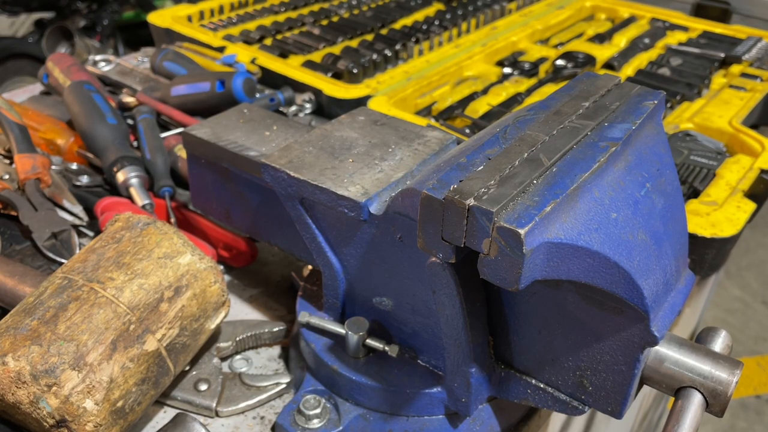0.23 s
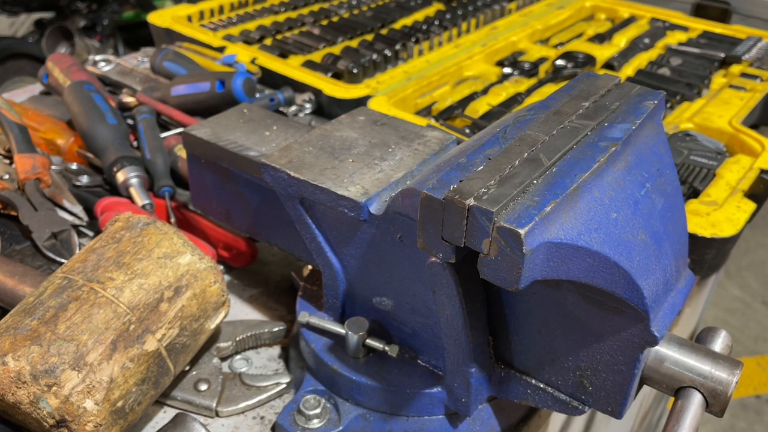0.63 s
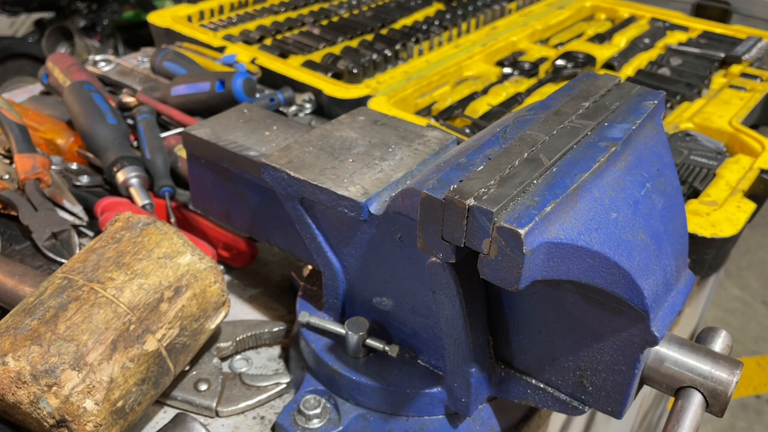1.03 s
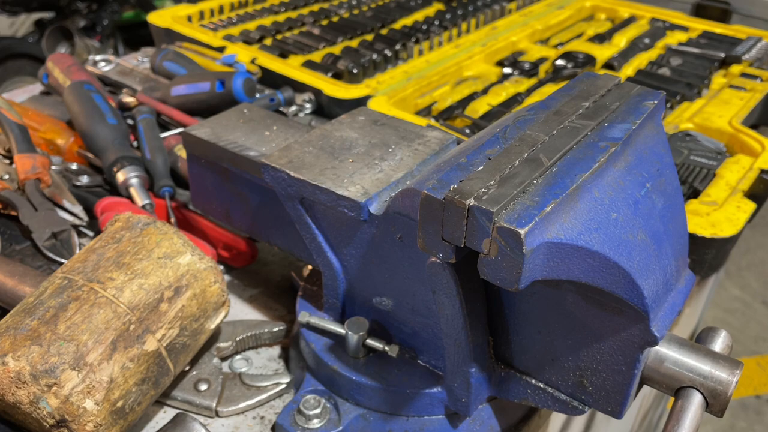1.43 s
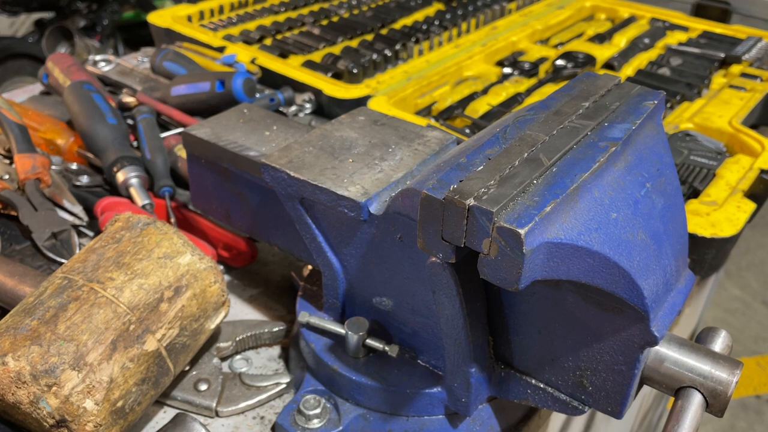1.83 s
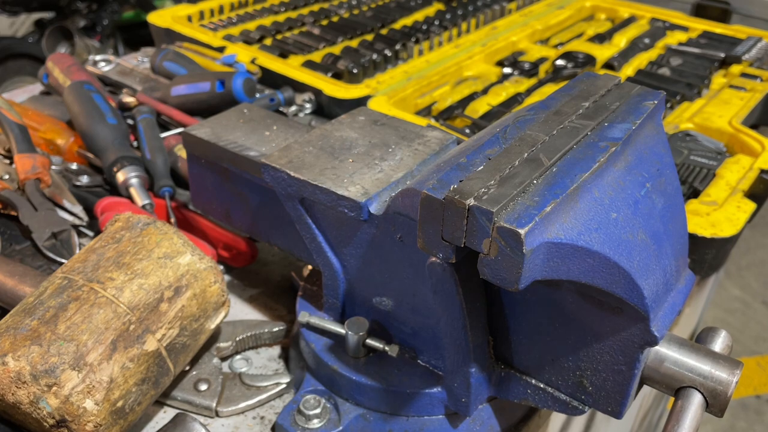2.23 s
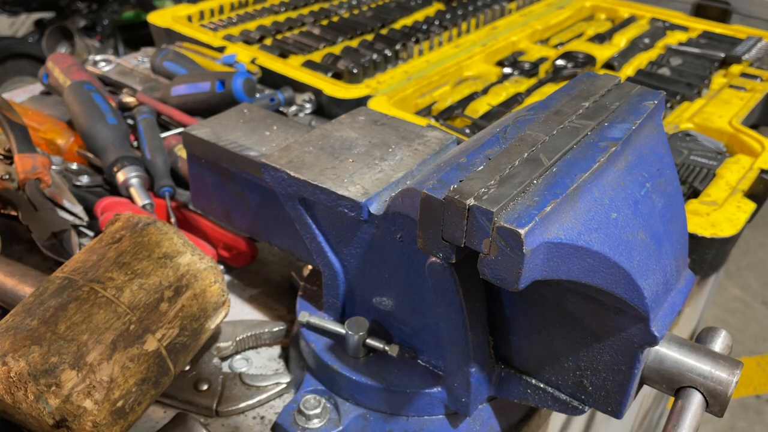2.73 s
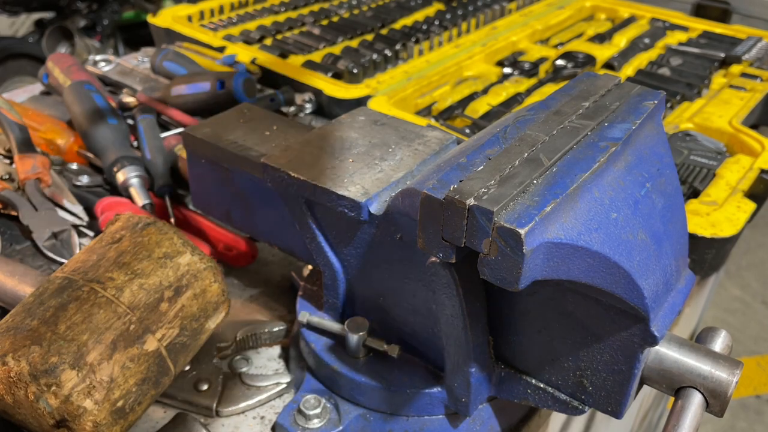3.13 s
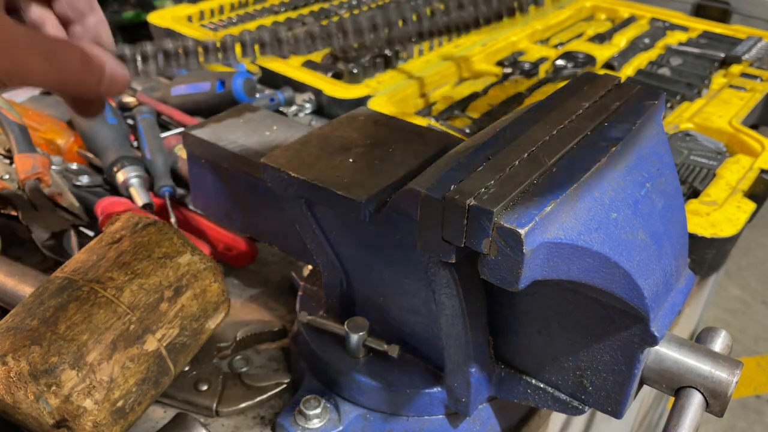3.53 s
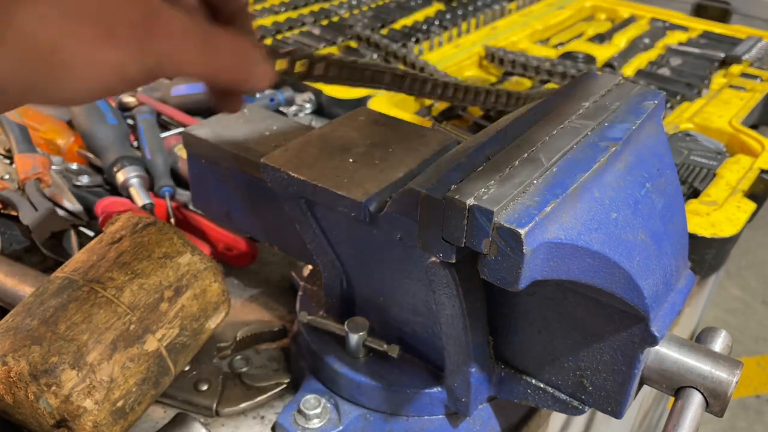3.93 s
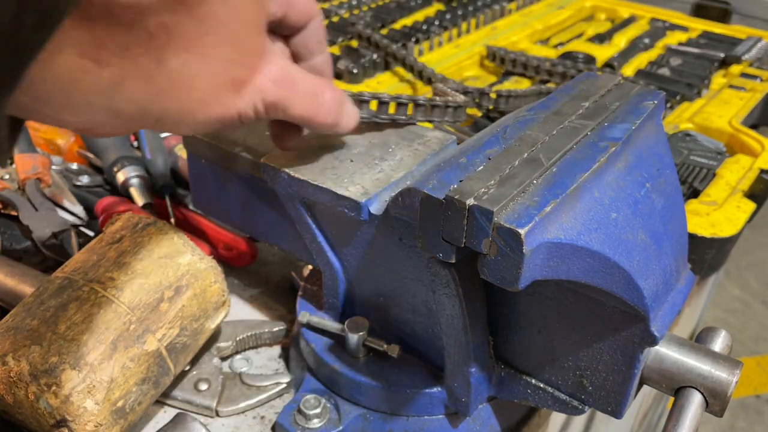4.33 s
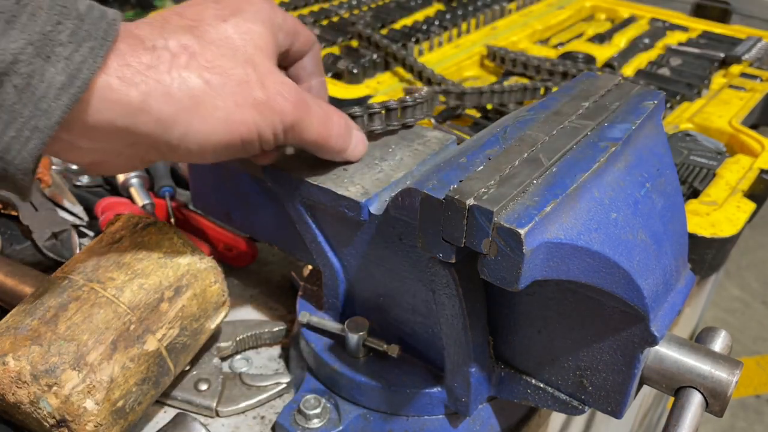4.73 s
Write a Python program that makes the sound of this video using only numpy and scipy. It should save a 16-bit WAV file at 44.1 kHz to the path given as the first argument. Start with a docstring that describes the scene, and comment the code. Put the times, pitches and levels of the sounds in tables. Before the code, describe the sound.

In a workshop with steady low machine hum, soft dull bumps and faint scrapes come first, with a gentle swelling rush. Then a roller chain hits a plastic tool tray twice, the second hit louder and brighter, and small ticks and a little gritty rubbing follow as it settles. Close stereo microphone, short room reverberation.

```python
"""A roller chain is lifted, carried and dropped on a plastic tool tray on a workshop bench, near a two-port microphone.
Handling and link contacts crack, ring and knock; the chain lands twice on the tray and settles in small touches.
A loose roller jingles, links slide as gritty noise, and bumps ring the bench's low modes, first before the landings.
A soft, broad rush swells and fades with a finer hiss on top, mains machinery hums, and the workshop answers."""
import sys
import numpy as np
from scipy import signal
from scipy.fft import rfft, irfft, next_fast_len
from scipy.io import wavfile
from scipy.ndimage import map_coordinates

SR = 44100
rng = np.random.default_rng(int(sys.argv[2]) if len(sys.argv) > 2 else 0)


def boost_factor(decibels):
    """Convert a level in decibels to a linear amplitude factor."""
    exponent = np.asarray(decibels, float) / 20
    return 10 ** exponent


def file_out(sig):
    """Save sig as 16-bit WAV at sys.argv[1]."""
    # one column per channel
    cols = np.atleast_2d(sig).T
    # limit, then scale
    lim = np.clip(cols, -1, 1)
    pcm = np.round(lim * 32767).astype(np.int16)
    wavfile.write(sys.argv[1], SR, pcm)


N = 219794  # samples

# colour of the soft rush, also moved up in pitch for rubbing and clacking links: (f/Hz, relative level/dB)
SOFT_COLOUR = [(150, -68), (400, 2.5), (1000, -0.5), (2000, -4), (4000, -14.5), (6000, -23.5), (8000, -22),
               (10000, -57)]
# modes of the chain's side plates: (f/Hz, level/dB, t60/s)
PLATES = [(3020, -4, .018), (3730, -4, .018), (4450, 0, .016), (5150, -5, .014), (5650, -8, .012),
          (6500, -9, .01)]
DETUNE = .012  # each blow's modes lie slightly off pitch at random, scatter as a share of pitch


def unit(x):
    """Scaled to rms 1."""
    return x / np.sqrt(np.mean(x ** 2) + 1e-20)


def along(points, hz):
    """(f/Hz, value) points read off on a log frequency axis."""
    f, v = np.transpose(points)
    return np.interp(np.log(hz + 1), np.log(f + 1), v)


def wobble(rate):
    """A smooth random curve, rate knots a second."""
    knots = rng.standard_normal(int(N * rate / SR) + 4)
    return map_coordinates(knots, [np.arange(N) * rate / SR])


def filtered(x, response):
    """x times a response of frequency, which may be complex."""
    m = next_fast_len(x.shape[-1] + 2048)
    spectrum = rfft(x, m) * response(np.fft.rfftfreq(m, 1 / SR))
    return irfft(spectrum, m)[..., :x.shape[-1]]


def ports(pair, apart=1.):
    """A shared and a differing sound become left and right; close blows differ less than diffuse sound."""
    # left-right likeness of diffuse sound: (f/Hz, likeness)
    alike = [(60, .98), (330, .92), (770, .05), (1200, .55), (1800, .72), (4000, .6), (6000, .7),
             (8000, .993), (9500, .993), (15000, .98)]
    turn = lambda hz: apart * np.arccos(np.clip(along(alike, hz), -1, 1)) / 2
    mid, side = filtered(pair, lambda hz: np.array([np.cos(turn(hz)), np.sin(turn(hz))]))
    return np.array([mid + side, mid - side])


def noise(colour):
    """Two unrelated coloured noises of rms 1."""
    return unit(filtered(rng.standard_normal((2, N)), lambda hz: boost_factor(along(colour, hz))))


def ring(modes, t, spread_db, detune=0.):
    """Two draws of a struck body's decaying modes, each at a new strength and phase, perhaps a little off pitch."""
    hz, db, t60 = np.transpose(modes)[:, :, None]
    shape = (2, len(modes), 1)
    level, phase = rng.standard_normal(shape), rng.uniform(0, 2 * np.pi, shape)
    shifted = hz * (1 + detune * rng.standard_normal((len(modes), 1)))
    decay = boost_factor(db + spread_db * level - 60 * t / t60)
    return (decay * np.sin(2 * np.pi * shifted * t + phase)).sum(axis=1)


def rise(t, s):
    """A soft onset with time constant s in seconds."""
    return 1 - np.exp(-t / s)


def add(out, s, sound):
    """Lays a two-row sound down at second s."""
    out[:, round(s * SR):][:, :sound.shape[1]] += sound


def machinery():
    """A broad, nearly steady noise with a mains tone and a narrow, unsteady whine."""
    # noise of the room machinery: (f/Hz, relative level/dB)
    air = [(15, -67), (25, -59.5), (49, -6), (87, -12), (108, -9.5), (229, -5), (268, -5), (466, -7.5),
           (665, -12.5), (907, -13.5), (5000, -43), (6500, -80), (11000, -120)]
    # mains tone and whine: (f/Hz, level/dB rms, wavers per s, waver/dB)
    hum_tones = [(119.9, -49.5, 2, 2), (468, -56, 45, 3)]
    t = np.arange(N) / SR
    hum = np.zeros(N)
    for hz, db, rate, waver_db in hum_tones:
        level = boost_factor(db + waver_db * wobble(rate))
        hum += level * np.sqrt(2) * np.sin(2 * np.pi * hz * t + .5 * wobble(rate))
    swell_db = .7 * wobble(4.3)
    broad = boost_factor(-44.5 + swell_db) * noise(air)
    return ports(broad + hum * np.array([[1], [-.2]]))


def shop(x):
    """The workshop's answer: x through a noise tail in which each frequency dies at its own speed."""
    # decay of the room: (f/Hz, t60/s)
    room_t60 = [(100, 0.49), (500, 0.4), (2000, 0.47), (6000, 0.52), (15000, 0.38)]
    hz, t, z = signal.stft(rng.standard_normal((2, SR // 2)), SR, nperseg=256)
    decay = boost_factor(-60 * t / along(room_t60, hz)[:, None])
    tail = signal.istft(z * decay, SR, nperseg=256)[1]
    tail = tail / np.linalg.norm(tail[0])
    late = np.pad(x, (300, 0))  # samples before the answer begins
    return ports(signal.fftconvolve(late[None], tail, axes=1)[:, :N])


def hiss():
    """Fine high noise whose top treble follows its own level."""
    # colour of the hiss: (f/Hz, relative level/dB)
    fine_colour = [(3000, -40.5), (5000, -4), (7000, 8.5), (9000, 15.5), (11000, 4), (14000, 6),
                   (15800, -6), (16700, -48)]
    # change of the hiss above 11 kHz, duller at first: (t/s, level/dB)
    top_treble = [(.75, -3), (.95, 3.5)]
    s, db = np.transpose(top_treble)
    fine = noise(fine_colour)
    top = filtered(fine, lambda hz: hz > 11000)
    return fine - (1 - boost_factor(np.interp(np.arange(N) / SR, s, db))) * top


def soft_rush():
    """A soft, broad, slightly grainy rush swells and fades, with a finer hiss on top."""
    # swells: (t/s, rush level/dB, fine hiss level/dB)
    swells = [(0, -57.5, -70), (.13, -58, -73), (.17, -53.5, -59.5), (.5, -50, -54), (.72, -49.5, -60),
              (.93, -58, -77), (.97, -49.5, -63), (1.1, -44, -58), (1.27, -41.5, -56.5), (1.42, -48, -65),
              (1.62, -56, -74.5), (1.85, -55, -68.5), (2.5, -57, -70), (3.3, -58, -69.5), (4.0, -55.5, -78),
              (4.12, -55, -72), (4.43, -46.5, -56), (4.52, -41, -55.5), (4.72, -47.5, -65),
              (4.98, -55.5, -69)]
    s, rush_db, fine_db = np.transpose(swells)
    t, flutter = np.arange(N) / SR, wobble(30)
    grain_db = 0.96 * flutter + 0.26 * wobble(150)
    rush = boost_factor(np.interp(t, s, rush_db) + grain_db) * noise(SOFT_COLOUR)
    fine = boost_factor(np.interp(t, s, fine_db) + 2 * flutter) * hiss()
    return ports(rush + fine)


def bumps():
    """Soft blows ring the bench's modes, most of all those near the pitch favoured by the place of the blow."""
    # blows on the bench: (t/s, level/dB, favoured f/Hz)
    blows = [(0.201, -30.5, 247), (0.233, -36.5, 111), (0.301, -31, 201), (0.32, -21.5, 168),
             (0.345, -29, 195), (0.555, -22, 201), (0.59, -24, 150), (0.611, -21.5, 182),
             (0.641, -21.5, 202), (0.674, -19.5, 150), (0.701, -11.5, 290), (0.721, -15.5, 220),
             (0.737, -16.5, 300), (0.779, -36, 300), (0.81, -34.5, 129), (3.426, -20, 410),
             (3.436, -24, 150), (3.468, -24, 305), (3.596, -37.5, 139), (3.827, -12, 414),
             (3.838, -16, 229), (3.86, -27.5, 164), (3.896, -31.5, 350)]
    # modes of the bench: (f/Hz, level/dB, t60/s)
    bench = [(81.1, 9, 0.14), (150, -0.5, 0.056), (183.3, 4.5, 0.051), (228, -0.5, 0.038), (280, 0, 0.043),
             (342, -1, 0.054), (411, 2.5, 0.034), (453, 7, 0.028)]
    place_loss_db = 11.5  # one octave from the favoured pitch
    out, t = np.zeros((2, N + SR)), np.arange(SR // 2) / SR
    for s, db, centre_hz in blows:
        struck = [(hz, db + level_db - place_loss_db * np.log2(hz / centre_hz) ** 2, t60)
                  for hz, level_db, t60 in bench]
        add(out, s, ring(struck, t, spread_db=1.5, detune=0.031) * rise(t, 0.0036))
    return ports(out[:, :N])


def slides():
    """Links rub over one another: a gritty burst whose body swells as the links dig in, then stops sharply."""
    # sliding links: (t/s, treble level/dB, body level/dB, length/s)
    strokes = [(0.225, -53, -54.5, 0.038), (0.295, -43, -56, 0.021), (0.53, -47, -55, 0.074),
               (0.699, -42, -45, 0.013), (1.404, -37.5, -63, 0.015), (2.257, -56, -57.5, 0.1),
               (2.554, -47, -51, 0.012), (2.718, -50, -52, 0.094), (2.871, -49.5, -51, 0.032),
               (2.909, -42, -58, 0.026), (3.134, -39, -40, 0.062), (3.568, -42, -43, 0.013),
               (4.168, -50, -41, 0.016), (4.273, -45, -45, 0.018), (4.605, -43, -46, 0.061)]
    t, fine, body = np.arange(N) / SR, np.zeros(N), np.zeros(N)
    for s, treble_db, body_db, length in strokes:
        done = np.clip((t - s) / length, 0, 1)
        stroke = np.sin(np.pi * done ** 0.69) ** 0.55
        fine += boost_factor(treble_db) * stroke
        body += boost_factor(body_db) * stroke * 2 * done
    grit = unit(boost_factor(2.36 * wobble(700) + 1.95 * wobble(90)))
    rub = [(hz * 1.76, db) for hz, db in SOFT_COLOUR]
    return ports(grit * (fine * hiss() + body * noise(rub)))


def jingles():
    """Thin, high pings of a loose roller on its pin."""
    # pings: (t/s, level/dB)
    pings = [(3.4685, -25), (3.9003, -35), (3.938, -44.5), (3.954, -29.5), (3.959, -40), (3.9606, -33.5)]
    # modes of the loose roller: (f/Hz, level/dB, t60/s)
    loose_roller = [(10400, -2, .005), (11500, -2, .006), (11350, -22, .1)]
    out, t = np.zeros((2, N + SR)), np.arange(SR // 8) / SR
    for s, db in pings:
        add(out, s, boost_factor(db) * ring(loose_roller, t, spread_db=5.5) * rise(t, 0.0004))
    return ports(out[:, :N])


def settling(count=40):
    """The slack chain settles: small touches at random moments within each settling, weaker towards its end."""
    # settlings: (t/s, length/s, steel tick level/dB, clack level/dB, tray knock level/dB)
    spells = [(3.48, 0.12, -52, -50.5, -47.5), (3.83, 0.14, -37, -47, -42.5), (4.45, .15, -60, -58, -41),
              (4.61, 0.06, -49, -54, -38)]
    centre_hz, scatter_oct = 1665, 0.4  # of the knocks' pitch
    spread_db, fade_db = 3.5, 9.5  # scatter of strength, loss from first to last
    rows = np.repeat(spells, count, axis=0)
    when = rng.uniform(size=len(rows))
    size, pitch = rng.standard_normal((len(rows), 2)).T
    change_db = spread_db * size - fade_db * when
    return np.column_stack([rows[:, 0] + when * rows[:, 1], rows[:, 2:] + change_db[:, None],
                            centre_hz * 2 ** (scatter_oct * pitch)])


def touches():
    """Every listed touch and two ever weaker ones just after it, with the settling."""
    # handling and link contacts: (t/s, steel tick level/dB, clack level/dB, tray knock level/dB, knock centre f/Hz)
    listed = [(0.3019, -47, -46, -62, 886), (0.5464, -42, -41, -70, 1310), (0.6403, -30, -44.5, -69, 2000),
              (0.6889, -42, -40.5, -32.5, 3200), (0.6998, -42, -33.5, -33.5, 4300),
              (1.759, -44, -59, -44, 1450), (1.804, -60, -62, -43, 1370), (1.8507, -36, -65, -51, 904),
              (2.5567, -47, -54, -54, 953), (3.4251, -10.5, -22.5, -12.5, 1120),
              (3.467, -21.5, -28.5, -26, 1190), (3.4722, -42, -55, -24.5, 1210),
              (3.4778, -23, -38.5, -40, 2400), (3.53, -36, -49, -56, 1280), (3.5502, -31, -40, -44, 2500),
              (3.574, -20.5, -37, -50, 1520), (3.769, -38, -48, -45, 1480), (3.778, -23, -37, -43, 1620),
              (3.786, -35, -40, -39, 1450), (3.811, -14, -42, -39, 1900),
              (3.8163, -30.5, -26.5, -28.5, 1210), (3.8238, 6.5, -17, -8.5, 980),
              (3.8262, -26.5, -19.5, -16, 1870), (3.8307, -27, -35, -13, 1940),
              (3.84, -38, -36, -31.5, 1290), (3.8462, -29.5, -34, -27, 1090), (3.9005, -42, -47, -57, 1550),
              (3.9992, -59.5, -48.5, -40.5, 1510), (4.1716, -35, -41, -35, 2200),
              (4.178, -60, -50, -48, 1600), (4.2676, -38, -42, -37, 950), (4.2853, -53, -50, -36, 1600),
              (4.348, -27, -39, -47, 2310), (4.5128, -46, -47.5, -42, 1660),
              (4.6138, -42.5, -38, -36, 1770), (4.6478, -42, -54, -44, 1680),
              (4.696, -22.5, -43.5, -38, 1640), (4.8845, -58, -51, -46.5, 1550)]
    tick_loss_db, loss_db = 19, 7  # per following touch; the steel tick fades faster
    shift_oct = 0.08  # scatter of the following touches' knock centre
    rows = np.array(listed)
    gaps_s = rng.uniform(0.001662, 0.0066, (len(rows), 2))
    shifts = rng.standard_normal((len(rows), 2))
    out = [rows, settling()]
    for k in range(2):
        later = rows - (k + 1) * np.array([0, tick_loss_db, loss_db, loss_db, 0])
        later[:, 0] += gaps_s[:, :k + 1].sum(axis=1)
        later[:, 4] *= 2 ** (shift_oct * shifts[:, k])
        out.append(later)
    return np.concatenate(out)


def dying_noise(t, t60):
    """Two white bursts that fall 60 dB in t60 seconds."""
    return rng.standard_normal((2, len(t))) * boost_factor(-60 * t / t60)


def steel_tick(t):
    """A short noise crack of steel and the high ring of rollers."""
    # colour of the crack: (f/Hz, level/dB)
    steel = [(4000, -40), (6000, -9), (9000, -5), (12000, -3), (13800, 3), (15300, 3), (16400, -12),
             (16900, -40)]
    # modes of the rollers: (f/Hz, level/dB, t60/s)
    rollers = [(12200, -34, .022), (14500, -33, .04)]
    crack = filtered(dying_noise(t, .006), lambda hz: boost_factor(along(steel, hz)))
    return crack + ring(rollers, t, spread_db=4, detune=DETUNE)


def plate_clack(t):
    """A rasp of noise and the ring of the side plates."""
    rasp = filtered(dying_noise(t, 0.011), lambda hz: boost_factor(along(SOFT_COLOUR, hz / 4.05)))
    return 3.93 * rasp + 0.5 * ring(PLATES, t, spread_db=3, detune=DETUNE)


def tray_knock(t, knock_hz):
    """The place of the blow favours the tray and plate modes near one pitch, with an unpitched rattle there."""
    # modes of the plastic tray: (f/Hz, level/dB, t60/s)
    tray = [(468, 2, .07), (715, -5, .03), (860, -3, .03), (1005, 0, .028), (1230, 0, .03), (1350, 0, .025),
            (1475, -2, .025), (1620, -4, .022), (1790, 1, .022), (1920, -1, .022), (2185, 0, .022),
            (2450, -2, .025)]
    place_loss_db, rattle_cycles = 40, 18  # loss one octave from the centre; cycles to fall 60 dB
    place_db = lambda hz: -place_loss_db * np.log2((hz + 1) / knock_hz) ** 2
    struck = [(hz, db + place_db(hz), t60) for hz, db, t60 in tray + PLATES]
    rattle = filtered(dying_noise(t, rattle_cycles / knock_hz), lambda hz: boost_factor(place_db(hz)))
    return ring(struck, t, spread_db=3.5, detune=DETUNE) + 2 * rattle


def contacts():
    """Handling and link contacts; each touch cracks, rings and knocks."""
    out, t = np.zeros((2, N + SR)), np.arange(SR // 16) / SR
    for s, tick_db, clack_db, knock_db, knock_hz in touches():
        metal = boost_factor(tick_db) * steel_tick(t) + boost_factor(clack_db) * plate_clack(t)
        knock = boost_factor(knock_db) * tray_knock(t, knock_hz)
        add(out, s, metal * rise(t, 0.00037) + knock * rise(t, 0.00028))
    return ports(out[:, :N], apart=.7)


def scene():
    """Near sources with the room's answer, over the soft rush and machinery."""
    # strength of the room's answer: (f/Hz, level/dB)
    walls = [(200, 6), (1200, -6), (5000, -9), (12000, -12)]
    near = contacts() + jingles() + slides() + bumps()
    answer = shop(filtered(near[0], lambda hz: boost_factor(along(walls, hz))))
    return near + boost_factor(-9.0) * answer + soft_rush() + machinery()


def roll_off(x):
    """The treble ends steeply here."""
    return signal.sosfilt(signal.butter(12, 16830, fs=SR, output="sos"), x)


def record(dry):
    """The microphone loses the deepest bass; the spacing of its ports turns the phase between left and right;
    the input stage rounds the loudest peaks and the top band is cut."""
    # left port behind the right: (f/Hz, phase/rad)
    lag = [(30, .25), (480, .7), (900, 0), (4500, 0), (6000, 1), (8600, 3.14), (12700, 5.8), (15600, 6.6)]
    headroom, knee, top_hz = .78, 4, 16700  # limit of the peaks, sharpness of its bend, top of the band
    low_cut = lambda hz: (1j * hz / (35 + 1j * hz)) ** 2
    phase = lambda hz: np.exp(.5j * along(lag, hz) * np.array([[-1], [1]]))
    turned = filtered(dry, lambda hz: low_cut(hz) * phase(hz))
    rounded = turned / (1 + np.abs(turned / headroom) ** knee) ** (1 / knee)
    return roll_off(filtered(rounded, lambda hz: hz < top_hz))


dry = scene()
out = record(dry)
file_out(out)
```